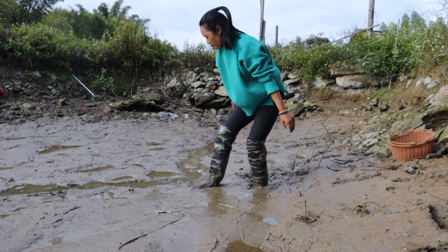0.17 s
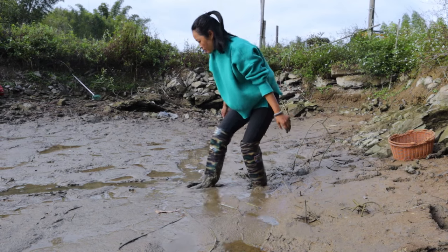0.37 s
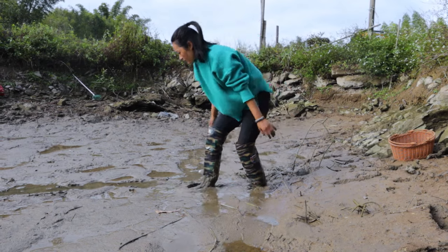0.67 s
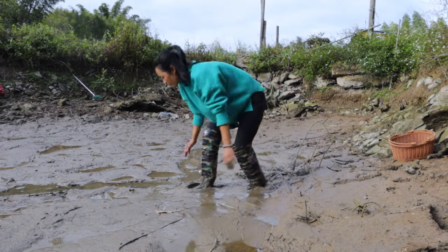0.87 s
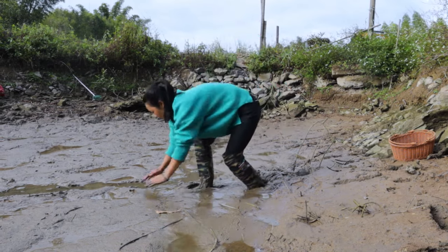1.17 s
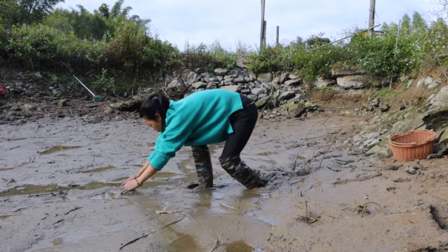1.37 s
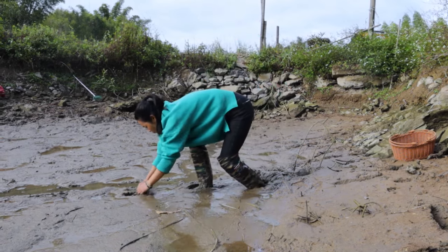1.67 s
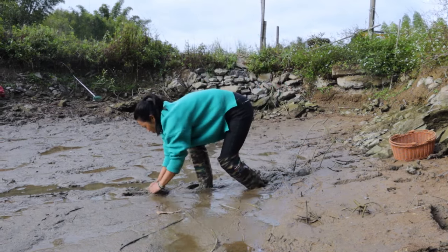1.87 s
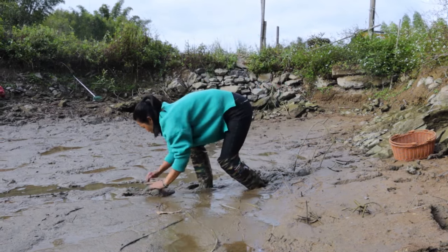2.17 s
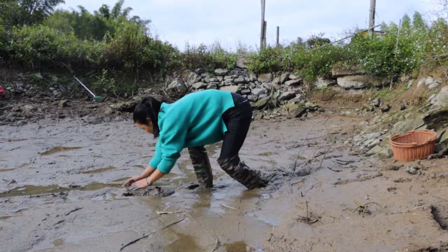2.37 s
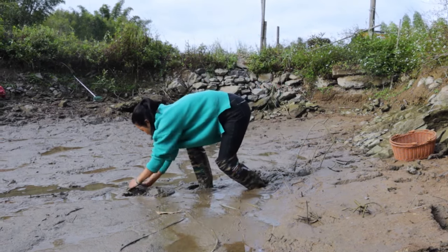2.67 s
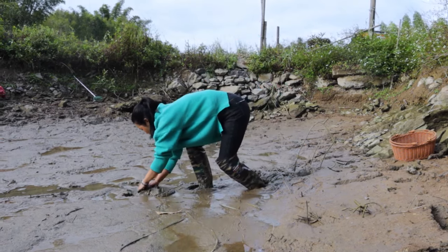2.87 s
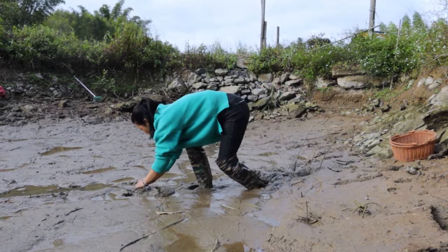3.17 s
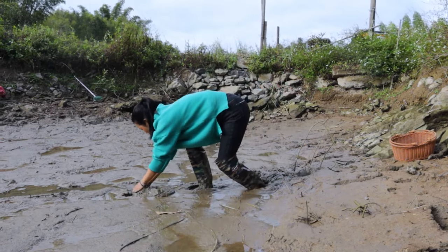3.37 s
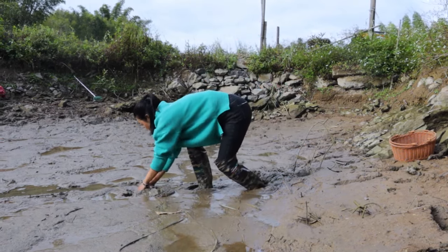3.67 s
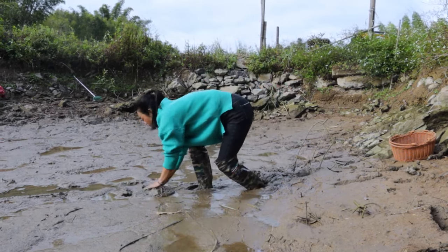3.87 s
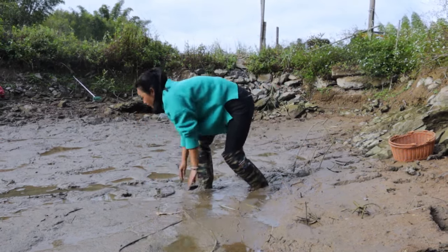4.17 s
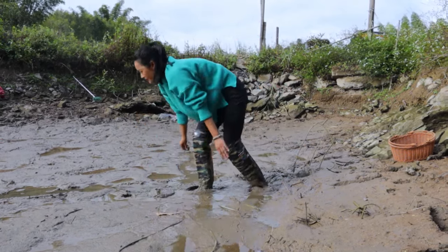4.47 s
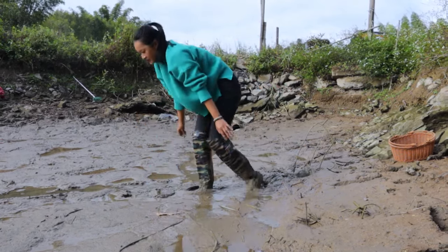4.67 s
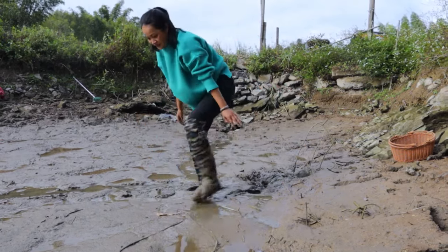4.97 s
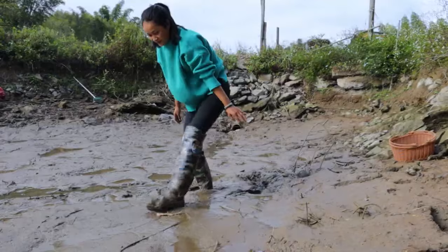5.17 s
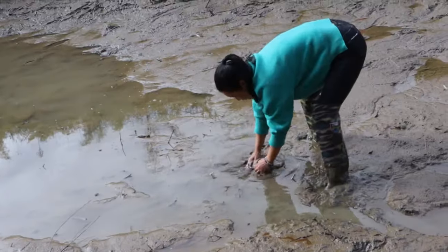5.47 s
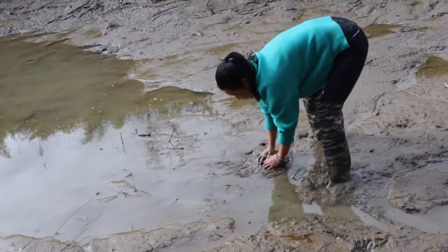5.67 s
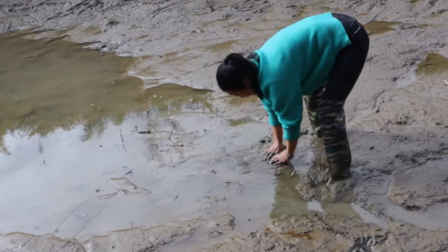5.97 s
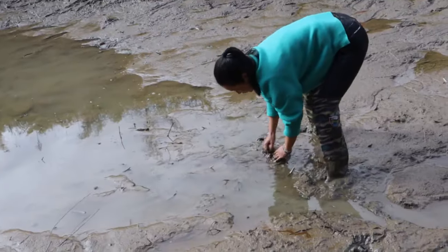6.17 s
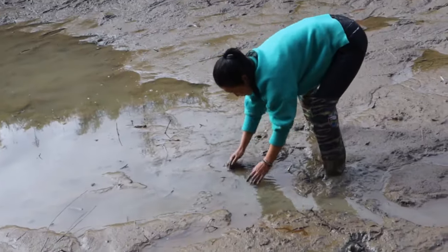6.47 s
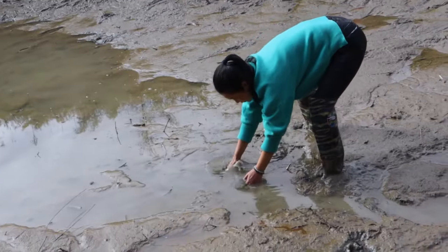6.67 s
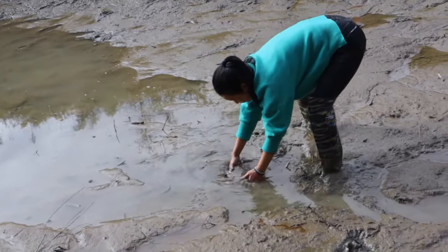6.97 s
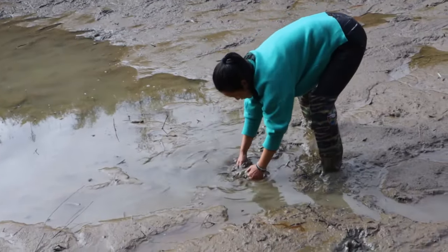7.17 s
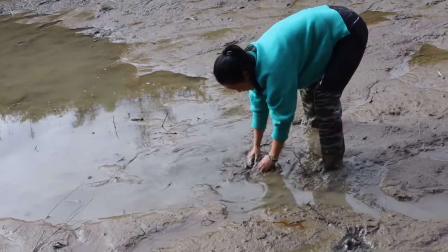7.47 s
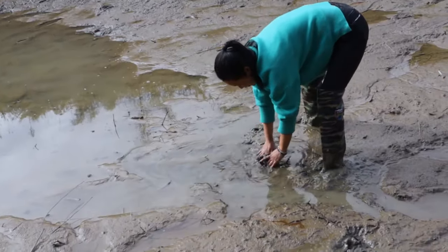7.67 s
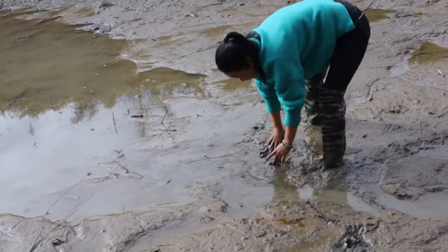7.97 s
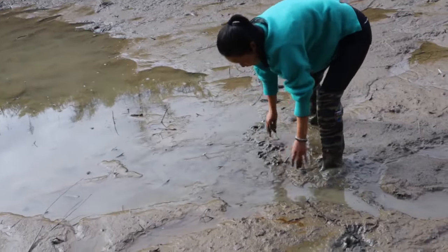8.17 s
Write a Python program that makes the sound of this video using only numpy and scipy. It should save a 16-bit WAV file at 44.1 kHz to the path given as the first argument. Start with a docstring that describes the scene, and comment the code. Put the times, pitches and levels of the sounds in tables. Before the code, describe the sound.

Outdoors at a muddy drained pond, a diesel engine drones steadily in the distance. A sharp wet boot smack comes at the start, then faint insect ticks, gusty wind rumble and small squelches and bubble pops as hands work the mud. A last wet smack precedes a hard cut, after which the engine is closer and louder, booming and clattering over barely audible mud sounds. Stereo outdoor microphone, unshielded from wind.

```python
"""Diesel machine by a drained pond

A four-cylinder diesel's exhaust booms and its block clatters: summed tones, and noise pulsed at the firing rate.
Boots and hands in wet mud smack, spray and pop: filtered noise bursts, tiny clicks and gliding damped tones.
An insect ticks and filtered-noise wind buffets the microphone. Two shots, the second nearer the machine,
are joined by a short, nearly silent cut.
"""
import sys
import numpy as np
from scipy import signal
from scipy.fft import rfft, irfft, next_fast_len
from scipy.io import wavfile
from scipy.ndimage import uniform_filter1d

SR = 44100
rng = np.random.default_rng(int(sys.argv[2]) if len(sys.argv) > 2 else 0)


def transcribe(u):
    """Save the signal u as a 16-bit wav file named by the first command-line argument.

    u: samples, shape (n,) or (channels, n), limited to [-1, 1]; the rate is SR.
    q: integer samples, one column per channel.
    """
    v = np.clip(np.atleast_2d(u).T, -1, 1)
    q = np.round(v * 32767).astype(np.int16)
    wavfile.write(sys.argv[1], SR, q)


N = 367353
T = np.arange(N) / SR
SIZE = next_fast_len(N)
HZ = np.maximum(np.arange(SIZE // 2 + 1) * SR / SIZE, 1.)
CUT_START_S, CUT_END_S = 5.4455, 5.4564


def undb(db):
    """dB to amplitude."""
    return 10 ** (np.asarray(db) / 20)


def level(x, db):
    """Sets the RMS level."""
    return x * undb(db) / np.sqrt(np.mean(x ** 2))


def over_time(rows):
    """Reads (s, value) rows along the time axis."""
    return np.interp(T, *np.transpose(rows))


def over_hz(table, axis=1):
    """Reads one column of (Hz, values) rows on a log-frequency axis."""
    table = np.array(table)
    return np.interp(np.log(HZ), np.log(table[:, 0]), table[:, axis])


def shape(x, gain):
    """Filters by a gain per frequency bin."""
    return irfft(rfft(x, SIZE) * gain, SIZE)[..., :N]


def resonate(x, hz, width_hz):
    """Two-pole band-pass, gain 1 at the centre."""
    return signal.lfilter(*signal.iirpeak(min(hz, .4 * SR), hz / width_hz, SR), x)


def twice(x, hz, width_hz):
    """The band-pass applied twice: steep skirts."""
    return resonate(resonate(x, hz, width_hz), hz, width_hz)


def walk(rate_hz):
    """Random levels held 1 / rate s and slewed twice; spread near 1."""
    k = int(SR / rate_hz)
    steps = np.repeat(rng.standard_normal(N // k + 1), k)
    return 1.5 * uniform_filter1d(uniform_filter1d(steps, k), k)[:N]


def add(out, s, sound):
    """Mixes a sound in at s seconds."""
    i = int(s * SR)
    out[:, i:i + sound.shape[-1]] += sound


def hiss(shot):
    """Spectrum of off-axis stereo noise: partly alike, tilted in level, the right turning over with pitch."""
    # the microphone pair, per shot: f/Hz, left-right correlation, right lag/rad, left minus right/dB
    pairs = [
        [(59, .99, -0.5, -1), (252, 0.82, 0.17, 1.5), (624, 0.63, 0, 2.5), (1190, 0.32, 2, 0.5),
         (1950, 0.81, 2, 2.5), (3520, 0.63, 3, 1.5), (6850, 0.73, 3, .5), (14800, 1, 4, 0)],
        [(60, 0.99, 3.5, -1), (249, 1, -1.5, 1), (600, 0.63, 0.46, 3), (960, 0.87, 1.81, 3.5),
         (1530, 0.88, 2.5, 2.5), (2630, 0.9, 3, 2.5), (3330, 0.96, 4, 5), (3850, 0.78, 4, 4.5),
         (4600, 0.89, 3.5, 3), (8300, 0.99, 4, 2), (15000, 0.48, 4, 0)],
    ]
    pair = pairs[shot]
    like = np.clip(over_hz(pair), 0, 1)
    turn_rad = over_hz(pair, axis=2)
    lean = undb(over_hz(pair, axis=3) / 2)
    mid, side = rfft(rng.standard_normal((2, SIZE))) * np.sqrt([1 + like, 1 - like])
    far = 1 / np.hypot(1, (HZ / 12000) ** 24)  # the top of distant sound is lost
    left = (mid + side) * lean
    right = (mid - side) * np.exp(-1j * turn_rad) / lean
    return far * np.array([left, right])


def air(shot, level_db):
    """Distant machinery and air: noise in octave bands that swell together and flicker alone."""
    # spectrum before levelling, per shot: f/Hz, density/dB per Hz
    colours = [
        [(40, -5.5), (100, 1.5), (200, -5.5), (400, -13), (1000, -14.5), (2000, -18), (4000, -22.5),
         (6000, -29.5), (11500, -32.5), (13000, -50), (15500, -75)],
        [(40, -35), (100, -14), (200, -5), (400, -9), (1000, -9.5), (2000, -9), (4000, -24.5), (7000, -28.5),
         (11500, -40), (13000, -65), (15500, -71)],
    ]
    swell = walk(0.73)
    noise = hiss(shot) * undb(over_hz(colours[shot]))
    out = 0
    for hz in 40 * 2. ** np.arange(10):
        skirt = np.maximum(1 - np.abs(np.log2(HZ / hz)), 0)
        band = irfft(noise * skirt, SIZE)[:, :N]
        out = out + undb(0.15 * swell + 1.19 * walk(8)) * band
    return level(out, level_db)


def wind():
    """Eddies buffet the ports in quick uneven puffs, the left port harder; a few land as single thumps."""
    # buffeting: t/s, level/dB
    gusts = [(0, -64), (.45, -60), (.95, -33.5), (1.2, -60), (1.6, -56), (1.74, -32), (1.9, -60),
             (2.08, -35.5), (2.5, -44), (2.85, -50), (3.05, -34), (3.35, -38.5), (3.88, -35), (4.0, -26.5),
             (4.15, -29), (4.31, -28), (4.36, -39), (4.44, -29), (4.52, -54), (4.67, -33), (4.92, -51),
             (5.02, -38), (5.44, -46.5), (7.9, -40.5), (8.33, -41)]
    # single hard eddies: t/s, level before port gain and decay/dB, f/Hz
    thumps = [(1.025, -30, 175), (1.697, -27, 175), (3.944, -33, 220), (3.953, -26, 85.05),
              (3.984, -28, 300), (3.996, -26, 130), (4.012, -26, 130), (4.03, -34, 200), (4.066, -36, 130),
              (4.091, -28, 110), (4.153, -24, 120), (4.197, -22, 80.1), (4.214, -24, 111),
              (4.243, -22, 150), (4.278, -27, 110), (4.296, -22, 100), (4.3235, -19, 220),
              (4.447, -21, 174.8), (4.603, -27.5, 174), (4.665, -32, 175), (4.975, -27, 175),
              (4.987, -25, 150), (5.047, -25.5, 175), (5.094, -22.5, 160), (5.2, -24.5, 149.3)]
    puffs_db = 3.9 * np.tanh(np.array([walk(30), walk(30)])) + 2.0 * np.tanh(walk(11))
    both, left = rng.standard_normal((2, N)) * undb(puffs_db)
    left = shape(left, 1 / np.hypot(1, (110 / HZ) ** 2))
    ports = np.array([both + 1.23 * left, 0.67 * both])
    rumble = 1 / np.hypot(1, (33 / HZ) ** 3) / np.hypot(1, (HZ / 130) ** 2.62)
    out = level(shape(ports, rumble), 0) * undb(over_time(gusts))
    for s, db, hz in thumps:
        turns = hz * np.arange(2048) / SR
        thump = np.sin(2 * np.pi * turns) * np.exp(-turns * 1.54)
        add(out, s, undb(db) * thump * np.array([[2.2], [1.3]]))
    return out


def insect():
    """Short wing ticks of uneven strength off to the left; the right port hears them turned over."""
    # chirps: first tick t/s, ticks, nominal peak/dB
    chirps = [(.507, 5, -44), (.878, 5, -49), (1.237, 5, -40), (4.19, 3, -45), (4.322, 5, -43)]
    wing_hz, half_length_s = 4140, 0.005
    gaps_s = 0.031, 0.031  # taken in turn
    out, t = np.zeros((2, N)), np.arange(-300, 300) / SR
    swell = np.exp(-(t / half_length_s) ** 2)
    tone = np.sin(2 * np.pi * wing_hz * t * (1 - 12 * t))  # pitch falls through the tick
    tick = swell * tone * np.array([[1.], [-.6]])
    uneven_db = 1.5 * rng.standard_normal(size=(len(chirps), 8))
    for (s, ticks, db), uneven in zip(chirps, uneven_db):
        for k in range(round(ticks)):
            add(out, s + t[0], undb(db + uneven[k]) * tick)
            s = s + gaps_s[k % 2]
    return out


def trickle():
    """Sparse tiny bubbles burst in the stirred mud: random clicks ring four bands."""
    out = 0
    for hz, db in (2600., -34), (4300., -40), (6500., -33.0), (10000., -41):
        sizes = undb(np.minimum(3.5 * rng.exponential(size=N), 9))
        ticks = (rng.random(N) < 10 / SR) * sizes  # 10 a second on average
        out = out + undb(db) * twice(ticks, hz, 0.37 * hz)
    return out * np.array([[1.], [-.4]])


def bubbles():
    """A damped tone gliding up as a bubble nears the surface; it reaches the ports a little apart."""
    # air freed from the mud: t/s, peak before decay/dB, start f/Hz, 60 dB decay/s
    freed = [(.354, -34.5, 2680, .02), (1.47, -33, 2043, .022), (2.7645, -25, 1350, .026),
             (2.799, -35, 2980, .02), (2.806, -32, 1940, .014), (2.843, -37, 2750, .04),
             (2.873, -24, 2660, .045), (2.9975, -32, 2140, .02), (3.438, -38, 3200, .015),
             (3.803, -29, 1750, .022), (4.052, -32, 1900, .025)]
    out, t = np.zeros((2, N)), np.arange(4096) / SR
    for s, db, hz, t60_s in freed:
        phase = 2 * np.pi * hz * (t + 0.25 * t ** 2 / t60_s) + np.array([[.6], [-.6]])
        # the mud wall trembles
        phase = phase + 2.5 * uniform_filter1d(rng.standard_normal(len(t)), size=60)
        envelope = np.minimum(t / 0.00035, 1) * np.exp(-np.log(1000) * t / t60_s)
        add(out, s, undb(db) * envelope * np.sin(phase))
    return out


def sprays():
    """Dense drops of uneven size that come in clumps, quick to start and slow to thin out."""
    # sprays of fine drops: t/s, length/s, level before envelope and filter/dB, centre f/Hz
    bursts = [(0.072, 0.018, -45, 3000), (0.17, 0.042, -34, 3800), (0.192, 0.021, -29.5, 3280),
              (0.214, 0.041, -40, 3200), (2.505, 0.011, -49, 7980), (2.77, 0.16, -56, 2817),
              (2.867, 0.067, -46, 2900), (3.369, 0.017, -51, 8000), (3.709, 0.02, -51, 8940),
              (5.232, 0.12, -57, 6000), (5.328, 0.034, -36, 2940), (6.933, 0.024, -48.5, 8950),
              (7.985, 0.018, -52, 7500), (7.997, 0.067, -55, 7000)]
    sizes = undb(np.minimum(2.6 * rng.exponential(size=N // 16 + 1), 8))
    clumps = undb(2.6 * walk(250))
    mid, side = rng.standard_normal((2, N)) * np.repeat(sizes, 16)[:N] * clumps
    drops = np.array([mid + 0.33 * side, mid - 0.49 * side])
    out = np.zeros((2, N))
    for s, length_s, db, hz in bursts:
        a, b = int(s * SR), int((s + 2 * length_s) * SR)
        u = np.arange(b - a) / (length_s * SR)
        envelope = np.minimum(u / 0.1, 1) * np.exp(-u ** 3)
        add(out, s, level(twice(drops[:, a:b], hz, 1.5 * hz), db) * envelope)
    return shape(out, 1 / np.hypot(1, (HZ / 12800) ** 12) / np.hypot(1, (1000 / HZ) ** 2))


def pops():
    """Each mud smack is a short noise burst ringing a small air pocket."""
    # smacks and pops: t/s, mid peak before low cut/dB, centre f/Hz, relative width (clipped, then scaled)
    smacks = [(0.057, -33, 9000, .6), (0.0672, -30, 4100, 1.2), (0.0729, -22, 3150, 0.38),
              (.081, -34, 2500, .3), (0.072, -28, 7160, 0.51), (.169, -31, 5000, 0.88),
              (.173, -37, 2500, .6), (.1805, -33, 5200, .4), (0.185, -23, 10000, 0.44),
              (0.1936, -22, 1900, 0.4), (0.1973, -23, 1190, 0.92), (.0735, -33, 900, .8),
              (0.1959, -19, 1950, 0.27), (0.197, -9.5, 3600, 0.77), (0.2002, -16, 4180, 0.63),
              (.2062, -34, 6000, .3), (.2085, -24, 7000, 1), (.213, -23, 3500, .7), (0.217, -27, 2700, .4),
              (.231, -33, 3500, .8), (.2375, -40, 4000, .6), (.251, -42, 3500, .6),
              (.2935, -37.5, 4800, 0.22), (.6734, -40, 6400, 0.18), (0.876, -36, 3850, .31),
              (.968, -37.5, 6100, 0.15), (1.611, -42, 5210, 0.32), (1.635, -36, 2890, .32),
              (1.641, -44, 5500, .6), (1.6565, -45, 11000, .15), (1.659, -43, 7500, .3),
              (1.6625, -44, 8500, .5), (1.6705, -44, 7800, .25), (1.701, -41, 3200, .2),
              (1.711, -45, 8000, .5), (1.738, -41, 2800, .25), (1.739, -47, 7800, .25),
              (1.656, -32.5, 2680, 0.4), (1.67, -34, 3470, 0.26), (1.8386, -31.5, 2487, 1),
              (2.462, -37, 4600, 0.15), (2.503, -36, 8080, 0.45), (2.763, -25.5, 2103, 1.13),
              (2.79, -37, 2600, 0.26), (2.805, -37, 4200, .3), (2.8195, -37, 4400, .3),
              (2.861, -39, 4500, .2), (2.872, -39, 4200, .3), (2.88, -37, 4700, .3),
              (2.914, -44, 6400, .15), (2.934, -33, 1797, .3), (2.946, -37, 1800, .3),
              (2.963, -39, 3000, .2), (2.81, -32, 4600, 0.29), (2.816, -27, 2390, .4),
              (2.817, -41, 5600, .3), (2.8233, -36, 4900, 0.69), (2.837, -33, 4400, 0.16),
              (2.856, -36, 3400, .15), (2.873, -36, 6000, 0.62), (2.882, -42, 8000, .7),
              (2.881, -27, 3030, 0.15), (2.891, -25, 1800, .4), (2.895, -25, 1700, 0.45),
              (2.908, -45, 5200, .25), (2.912, -35, 2800, .2), (2.92, -36, 2800, 0.18),
              (2.92, -35, 1900, .4), (2.927, -30, 1500, 0.36), (2.897, -38, 6500, .6),
              (2.894, -36, 3150, .15), (2.898, -35, 4500, .3), (2.9695, -36, 10650, 0.073),
              (3.143, -39, 9830, 0.31), (3.3688, -35, 4710, 0.31), (3.3875, -28.5, 8490, 0.54),
              (3.387, -26, 1830, 0.51), (3.393, -30, 7600, .25), (3.4111, -40, 3980, .44),
              (3.456, -32, 2780, 0.2), (3.726, -42, 9010, 0.65), (3.7707, -27.5, 1750, 0.34),
              (3.8013, -27, 2100, 0.38), (3.835, -40, 2797, .2), (3.865, -40, 3000, 0.18),
              (3.925, -37, 1600, .25), (3.951, -39, 1704, 0.29), (3.973, -31, 1900, .3),
              (4.008, -37, 3800, 0.48), (4.01, -39, 1600, .25), (4.0491, -25.5, 2300, 0.53),
              (4.068, -39, 3550, .15), (4.16, -42, 8800, .25), (4.173, -38, 3800, .3),
              (4.178, -43, 10000, .4), (4.1924, -32, 3150, 0.3), (4.205, -45, 9500, .25),
              (4.228, -39, 5400, .2), (4.2355, -43, 9500, .6), (4.24, -42, 5500, .2),
              (4.249, -42, 6500, .7), (4.252, -37, 3300, .3), (4.623, -31.5, 4000, 0.35),
              (4.927, -40, 11000, 0.44), (5.13, -39, 6500, 0.6), (5.155, -33, 3100, 0.16),
              (5.237, -37, 3810, 0.39), (5.245, -35, 3540, 0.79), (5.262, -41, 8000, .6),
              (5.276, -41.5, 6000, .8), (5.296, -46, 8480, 0.48), (5.3014, -34, 2980, .34),
              (5.3234, -26, 3570, 0.99), (5.3348, -17.5, 3400, 1.3), (5.339, -24, 3400, 0.33),
              (5.3386, -27, 2000, 0.75), (5.344, -24, 2000, 0.77), (5.346, -22, 4900, 1.35),
              (5.3486, -20, 5270, 1.3), (5.358, -40, 10500, .4), (5.385, -34.5, 6330, 0.71),
              (6.7062, -30, 2600, 1.3)]
    t60_s = 0.011
    out, t = np.zeros((2, N)), np.arange(2048) / SR
    envelope = np.minimum(t / 0.00067, 1) * np.exp(-np.log(1000) * t / t60_s)
    for s, db, hz, share in smacks:
        mid, side = rng.standard_normal((2, len(t))) * envelope
        mid[40] += 3  # the film of mud snaps
        pair = np.array([mid + 1.1 * side, mid - 1.1 * side])
        width_hz = 1.4 * hz * np.clip(share, .05, 1.2)
        ring = resonate(twice(pair, hz, width_hz), hz, 2.2 * hz)
        add(out, s, undb(db) * ring / np.abs(ring.mean(axis=0)).max())
    return shape(out, 1 / np.hypot(1, (900 / HZ) ** 2))  # the pockets are too small to sound low


def panel(knock, hz, width_hz):
    """One resonance, driven by its own stretch of the noise; its pitch wanders as the path length shifts."""
    stretch = np.roll(knock, rng.integers(N), axis=1)
    ring = level(twice(stretch, hz, width_hz), 0)
    place = np.arange(N) + 0.0011 * SR * walk(5)
    return np.array([np.interp(place, np.arange(N), side) for side in ring])


def engine(shot, waver_db, shake, pulse, flutter_db, rough_db):
    """Exhaust tones on the cycle, each wavering; combustion noise pulses per firing and rings the block."""
    # per shot: t/s, boom f/Hz (twice the firing rate), boom level/dB, firing tone level/dB
    curves = [
        [(0, 94.8, -29, -34), (.7, 93.46, -29, -39), (.9, 91.34, -28.5, -30), (1.85, 88.1, -26, -42),
         (2.0, 90.8, -36, -35), (2.5, 90.06, -26, -41), (2.9, 89.8, -35, -49), (3.0, 87.06, -37, -35),
         (3.2, 87.1, -31.5, -32), (3.4, 86.47, -30, -49), (4.0, 85.4, -30.5, -44), (4.25, 85.75, -28.5, -46),
         (4.4, 85, -39, -48), (4.85, 85.2, -38.5, -55), (5.0, 84.6, -47, -50), (5.44, 83, -51, -53)],
        [(5.46, 93, -22, -36), (5.59, 93, -19.5, -37), (5.87, 94, -22, -35), (6.33, 91.2, -18.5, -39),
         (6.44, 98.3, -19.5, -32), (6.6, 98.4, -23, -35), (6.75, 91, -20.5, -38), (6.89, 93.4, -18, -40),
         (7.07, 97.34, -20.5, -35), (7.9, 100.7, -22.5, -35.5), (8.03, 105.1, -21.5, -30),
         (8.24, 104.5, -22.5, -32), (8.33, 105, -22, -30)],
    ]
    # exhaust tones, per shot: multiple of the four-stroke cycle, level re boom/dB
    tones = [
        [(5, -17.5), (6, -10), (7, -16), (8, 0.5), (10, -28), (12, -20.5), (14, -43), (16, -23), (20, -34.5),
         (24, -33), (28, -30.5)],
        [(5, -26), (6, -21), (7, -14), (8, 0), (9, -23.5), (10, -24.5), (12, -28.5), (16, -30), (20, -28.5),
         (22, -29.5), (24, -35), (27, -32)],
    ]
    # extra level of tones above the boom, per shot: t/s, level/dB
    overtones = [
        [(0, -1), (.5, -2.5), (1.8, 0), (2.05, 10.5), (2.3, 3.5), (2.5, 2), (2.62, 13), (2.75, 9), (2.9, 15),
         (3.1, 3), (4, 1), (5.45, 5)],
        [(5.45, -0.5), (6.5, 0.5), (7.3, -1), (8.33, 2.5)],
    ]
    # clatter gain, rising with load, per shot: t/s, level/dB
    clatter_gains = [
        [(0, -54.5), (1, -58.5), (1.6, -53), (2, -50.5), (2.6, -47), (3, -44.5), (3.5, -47), (4, -47.5),
         (4.5, -49), (5, -49), (5.45, -50.5)],
        [(5.45, -43), (5.9, -45.5), (6.2, -45), (6.5, -43), (6.8, -44.5), (7.1, -43), (7.5, -43.5),
         (7.9, -42.5), (8.33, -41)],
    ]
    # block and panel resonances, per shot: f/Hz, width/Hz, level re clatter gain/dB
    blocks = [
        [(946, 90, -9.5), (1372, 130, -3), (1520, 64, -4.5), (1618, 150, -3), (1826, 203, 0), (2280, 540, -4),
         (2775, 500, -6.5), (3740, 1600, -10)],
        [(490, 66, -23), (1213, 150, -4), (1350, 360, 3), (1590, 170, -3.5), (2060, 2400, -1), (2533, 230, 0),
         (3070, 3200, -0.5), (3580, 170, -17), (5100, 3100, -26)],
    ]
    # resonances that swell and fade, per shot: f/Hz, width/Hz, [t/s, level re clatter gain/dB]
    swells = [
        [(485, 28, [(0, -12), (1.5, -10), (2.5, -8.5), (3.0, -8.5), (3.55, -8), (3.9, -6), (4.4, -11),
         (5.45, -11.5)])],
        [(320.3, 27, [(5.45, 1.5), (5.65, 2), (5.8, -5), (6.1, 0), (6.35, 2.5), (6.5, -8), (6.75, 3),
         (7.0, -2.5), (7.5, -6), (7.9, 0), (8.15, 4.5), (8.33, -2)]), (676.5, 49, [(5.45, -8.5), (5.9, -1),
         (6.2, -6), (6.9, -8), (7.15, -3), (7.6, -3), (8.33, -4)]), (770, 90, [(5.45, -4.5), (6.0, -4),
         (6.4, -1), (6.6, -5), (6.9, 2), (7.2, -3), (7.7, -4), (8.33, -3)]), (1030, 90, [(5.45, 0.5),
         (6.3, -0.5), (6.42, 1), (6.53, 9), (6.63, 2.5), (6.8, -2), (7.1, 1), (7.6, 5.5), (7.8, 1), (8.0, 1),
         (8.33, -2)]), (3700, 330, [(5.45, -9), (6.2, -13), (6.4, -3), (6.8, -14), (6.95, -3.5), (7.5, -3),
         (8.33, -4)])],
    ]

    s, *columns = np.transpose(curves[shot])
    boom_hz, boom_db, firing_db = (np.interp(T, s, c) for c in columns)
    cycle = 2 * np.pi * np.cumsum(boom_hz) / (8 * SR)
    firing = np.cos(4 * cycle)  # four firings a cycle
    upper_db = over_time(overtones[shot])
    exhaust = 0
    for k, db in tones[shot]:
        # the weaker a tone, the more the path through the air shakes its level and phase
        tone_db = db + (k > 8) * upper_db
        tone_db = tone_db + (waver_db - 0.081 * db) * np.tanh(walk(11)) + rough_db * walk(90)
        phase = k * cycle + rng.uniform(0, 2 * np.pi) - shake * db * walk(14)
        exhaust = exhaust + undb(tone_db) * np.sin(phase)
    low = undb(boom_db) * exhaust + undb(firing_db + 1.3 * waver_db * walk(13)) * firing

    knock = irfft(hiss(shot), SIZE)[:, :N]
    load_db = over_time(clatter_gains[shot])
    # under load the higher modes gain most, dB an octave
    bite = 0.15 * (load_db - np.mean(clatter_gains[shot], axis=0)[1])
    clatter = 0
    for hz, width_hz, db in blocks[shot]:
        flutter = flutter_db * (walk(9) + np.tanh(walk(2.528)))
        mode_db = db + flutter + bite * np.log2(hz / 1500)
        clatter = clatter + undb(mode_db) * panel(knock, hz, width_hz)
    for hz, width_hz, rows in swells[shot]:
        mode_db = over_time(rows) + 0.7 * flutter_db * np.tanh(walk(12))
        clatter = clatter + undb(mode_db) * panel(knock, hz, width_hz)
    return np.sqrt(2) * low + undb(load_db) * (1 + pulse * firing) * clatter  # sqrt 2: RMS to peak


def scene():
    """The far shot, then the near one, under wind, mud and insect."""
    far = air(0, level_db=-39)
    far = far + engine(0, waver_db=1.55, shake=0.032, pulse=0.051, flutter_db=1.95, rough_db=0.9)
    near = air(1, level_db=-34.5)
    near = near + engine(1, waver_db=0.7, shake=0.033, pulse=0.19, flutter_db=1.3, rough_db=0.63)
    machine = np.where(T < CUT_END_S, far, near)
    return machine + wind() + insect() + trickle() + bubbles() + sprays() + pops()


def record(dry):
    """The microphone dulls the top; a nearly silent cut joins the shots; a steep low-pass ends the band."""
    dull = signal.sosfilt(signal.butter(4, 13200, fs=SR, output="sos"), dry)
    fade = np.clip((CUT_START_S - T) / 0.00067, .03, 1)
    cut = dull * np.where(T < CUT_END_S, fade, 1)
    return signal.sosfilt(signal.ellip(8, .2, 70, 15500, fs=SR, output="sos"), cut)


dry = scene()
out = record(dry)
transcribe(out)
```